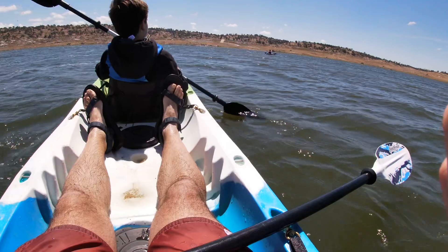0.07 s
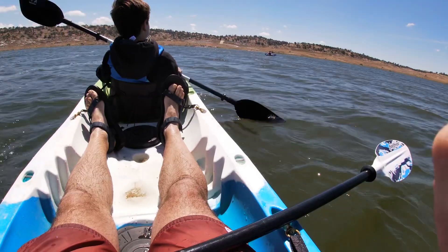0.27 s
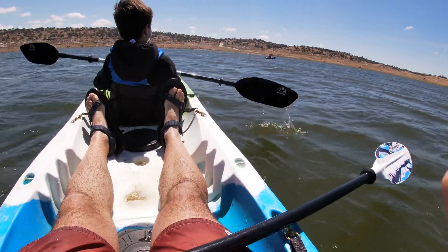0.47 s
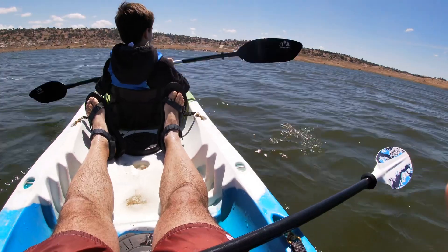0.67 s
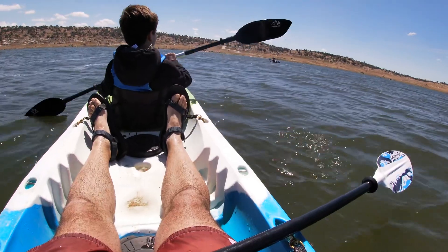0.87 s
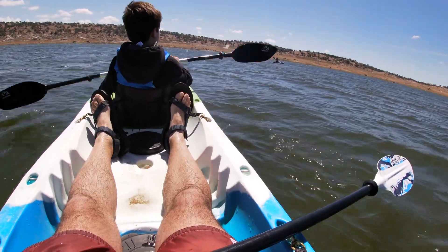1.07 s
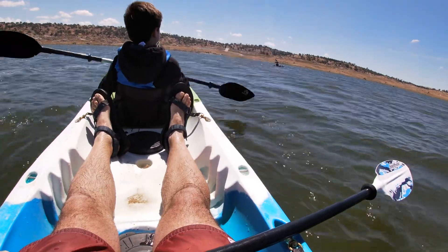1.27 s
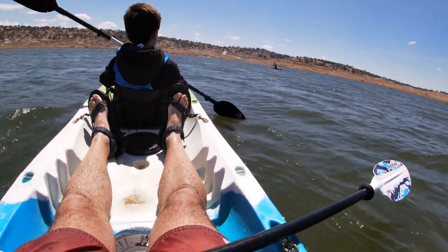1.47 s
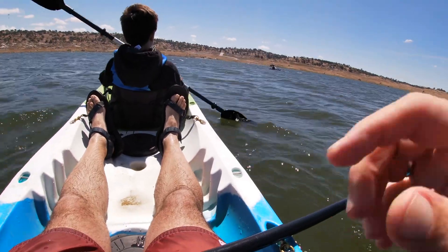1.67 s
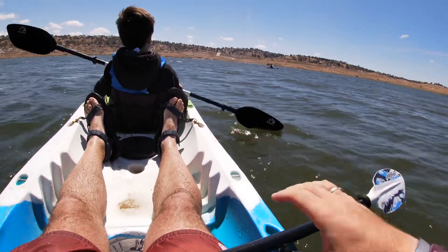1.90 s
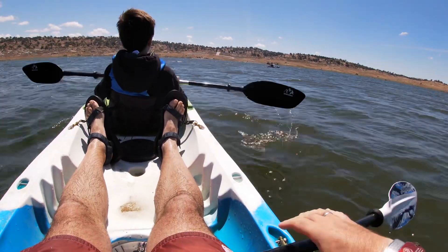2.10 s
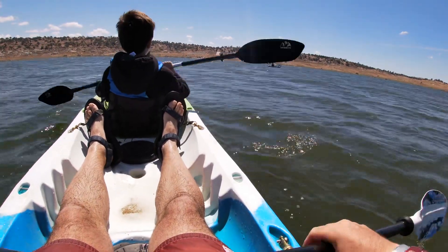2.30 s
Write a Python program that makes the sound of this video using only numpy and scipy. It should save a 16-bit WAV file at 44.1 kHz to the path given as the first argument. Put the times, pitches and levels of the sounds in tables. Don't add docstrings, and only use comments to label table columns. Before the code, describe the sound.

Small waves thump a hollow plastic kayak on open water, building to one loud paddle-shaft knock with a splash, then drips, gurgles and soft sloshing; close deck microphone with low wind rumble.

```python
import sys
import numpy as np
from scipy import signal
from scipy.fft import rfft, irfft
from scipy.io import wavfile
from scipy.ndimage import uniform_filter1d

SR = 44100
rng = np.random.default_rng(int(sys.argv[2]) if len(sys.argv) > 2 else 0)


def volts(x):
    e = np.asarray(x, float) / 20
    return 10 ** e


def wav_record(signal):
    frames = np.transpose(np.atleast_2d(signal))
    bounded = np.clip(frames, -1, 1)
    quanta = np.round(bounded * 32767).astype(np.int16)
    wavfile.write(sys.argv[1], SR, quanta)


N = 103458


def noise():
    return rng.standard_normal(N)


def smooth_twice(x, size):
    return uniform_filter1d(uniform_filter1d(x, size), size)


def curve(rows, col=1):
    rows = np.array(rows)
    return np.interp(np.arange(N) / SR, rows[:, 0], rows[:, col])


def tint(x, points):
    points = np.array(points)
    freq = np.arange(N // 2 + 1) * SR / N + 1
    level_db = np.interp(np.log(freq), np.log(points[:, 0]), points[:, 1], left=-60, right=-140)
    y = irfft(rfft(x) * volts(level_db), N)
    return y / np.std(y)


def walk(rate):
    hold = int(SR / rate)
    steps = np.repeat(rng.standard_normal(N // hold + 1), hold)
    return 1.3 * smooth_twice(steps, hold)[:N]


def grains(rows, rise, glide):
    out = np.zeros(N + SR)
    for s, db, hz, ms in rows:
        u = np.arange(-3 * rise, 5, 1000 / SR / ms)
        env = np.where(u < 0, np.exp(-(u / rise) ** 2), np.exp(-u / (1 - rise)))
        tone = np.cos(2 * np.pi * hz * ms / 1000 * u * (1 + glide * u))
        i = max(int(s * SR - 3 * rise * ms * SR / 1000), 0)
        out[i:i + len(u)] += volts(db) * env * tone
    return out[:N]


def scatter(count, lo_hz, hi_hz, cycles, spread_db):
    r = rng.random((count, 3))
    start = .05 + r[:, 0] * N / SR
    level_db = -spread_db * np.log(r[:, 2] + .05)
    hz = lo_hz * (hi_hz / lo_hz) ** r[:, 1]
    x = grains(zip(start, level_db, hz, 1000 * cycles / hz), .4, .05)
    return x / np.std(x)


# (time [s], level [dB])
HISS_GAIN = [(.04,-99),(.1,-75.5),(.16,-78),(.19,-90.5),(.28,-86),(.3,-82),(.6,-84.5),(.63,-73.5),(1.2,-75),(1.37,-75),(1.4,-79),(1.7,-94),(2.34,-86.5)]
# (frequency [Hz], level [dB])
HISS_COLOUR = [(1100, -12.5), (1650, 4), (2400, -8.5), (3200, -6), (3700, -10.5), (4830, -10.5),
               (5630, -8.5), (6500, -26), (9000, -47.5)]


def gain_hiss():
    return tint(noise(), HISS_COLOUR) * volts(curve(HISS_GAIN) + 5.5 + 2.0 * walk(40))


# (time [s], level [dB])
BREEZE = [
    (1.4, -100),
    (1.75, -79.5),
    (2.34, -72),
]


def breeze():
    return tint(noise(), [(3000, 8.5), (7000, -10.5), (10000, -16), (11000, -31)]) * volts(curve(BREEZE))


# (time [s], peak level [dB], pitch [Hz], length [ms])
CHIRP = (2.198, -66, 12400, 2.5)


def insect():
    return grains([CHIRP], .4, 0)


# (time [s], level [dB])
GUSTS = [(.04,-58.5),(.09,-48.5),(.28,-63.5),(.45,-48),(.58,-45.5),(.72,-46.5),(.82,-36),(.89,-44),(.94,-35.5),(1.07,-44.5),(1.21,-39.5),(1.31,-42.5),(1.42,-35),(1.54,-48.5),(1.72,-40),(1.8,-50),(1.96,-41.5),(2.2,-48),(2.31,-43.5)]


def wind():
    x = tint(noise(), [(18, -12), (36, 4), (48, 0), (80, -5), (130, -26.5), (250, -46.0)])
    local_rms = np.sqrt(smooth_twice(x ** 2, 2500))
    return x / local_rms * volts(curve(GUSTS))


# (time [s], slosh level [dB], wash level [dB])
FLOW = [(.04,-68.5,-71.5),(.28,-69,-78),(.31,-66.5,-78),(.6,-58.5,-74),(.64,-56.5,-68.5),(1.1,-51.5,-66.5),(1.35,-44,-63.5),(1.42,-42.5,-59),(1.7,-45.5,-58.5),(2.34,-45.5,-57.5)]
# (frequency [Hz], level [dB])
SLOSH_COLOUR = [(80, -3), (160, -1.5), (480, -3.5), (650, -9), (1100, -21)]
WASH_COLOUR = [(800, -8), (1290, 0.5), (1500, -7), (1640, -8), (2200, -3), (2900, -6.5), (3350, -28),
               (3700, -37)]


def water():
    gurgles = scatter(count=500, lo_hz=110, hi_hz=866, cycles=1.17, spread_db=2)
    slosh = tint(noise() * volts(1.0 * walk(36)) + 0.22 * gurgles, SLOSH_COLOUR)
    fizz = scatter(count=2500, lo_hz=800, hi_hz=3870, cycles=9.1, spread_db=2)
    wash = tint(noise() * volts(0.92 * walk(30)) + 0.5 * fizz, WASH_COLOUR)
    return slosh * volts(curve(FLOW) + 1.5) + wash * volts(curve(FLOW, col=2) - 2.0)


def during(start, end):
    t = np.arange(N) / SR
    return uniform_filter1d(1. * (t > start) * (t < end), size=1500)


# (start [s], end [s], low edge [Hz], high edge [Hz], level [dB])
FILMS = [
    (0.278, 0.56, 3170, 4010, -81.5),
    (0.621, 1.66, 2890, 3320, -74.5),
    (1.17, 1.377, 5100, 5840, -76),
    (1.383, 1.67, 4070, 4400, -79),
    (1.381, 1.68, 4600, 4750, -83.5),
    (1.12, 1.9, 6300, 7600, -90.5),
    (1.51, 1.46, 6400, 7370, -84),
    (1.752, 2.35, 11840, 12930, -100),
]


def films():
    out = 0
    for start, end, lo, hi, db in FILMS:
        film = tint(noise(), [(.97 * lo, -30), (lo, 0), (hi, 0), (1.03 * hi, -40)])
        patchy = volts(1.8 * walk(70))
        out = out + volts(db) * film * during(start, end) * patchy
    return out


# (start [s], end [s])
MIST_SPAN = (1.06, 1.6)


def mist():
    droplets = scatter(count=5000, lo_hz=1500, hi_hz=9000, cycles=4, spread_db=-4)
    droplets = tint(droplets, [(1500, 11), (6000, -6), (7000, -21), (10000, -34)])
    return volts(-74.5) * droplets * during(*MIST_SPAN)


# (time [s], peak level [dB], pitch [Hz])
TICKS = [(0.164,-74,4040),(.44,-63,3260),(0.44,-62,4500),(.451,-64,3640),(1.132,-72,6400),(1.161,-73,6700),(1.175,-55,5400),(1.192,-71,8600),(1.203,-57,5300),(1.229,-70,5600),(1.257,-58,5800),(1.276,-73,8200),(1.304,-71,7800),(1.355,-48,5490),(1.358,-65,3700),(1.376,-69,6600),(2.211,-64,3670),(2.21,-62,2750)]


def ticks():
    cycles = 9.3
    tones = grains([(s, db, hz, 1000 * cycles / hz) for s, db, hz in TICKS], 0.52, 0)
    return tones * (0.7 + 3 * smooth_twice(noise(), 24))


# (time [s], peak level [dB])
SLAPS = [(0.164, -55.5), (0.296, -61.5), (0.643, -66.5), (0.844, -49.5), (1.159, -53), (1.193, -53),
         (1.216, -44.5), (1.255, -47.5), (1.275, -53), (1.304, -57), (1.356, -51), (1.368, -39),
         (2.209, -51)]
# (frequency [Hz], level [dB per Hz])
SLAP_COLOUR = [(900, 5), (2200, 4.5), (5500, -8.5), (7000, -29), (10000, -29)]


def slaps():
    t, env = np.arange(N) / SR, 0
    t60_s = 0.025
    for s, db in SLAPS:
        env = env + volts(db) * (t > s) * np.exp(-np.log(1000) * np.abs(t - s) / t60_s)
    return uniform_filter1d(env, size=60) * tint(noise(), SLAP_COLOUR)


# (time [s], peak level [dB], pitch [Hz], length [ms])
RISERS = [
    (1.435,-48,1400,4.1),
    (1.553,-45,1205,6.5),
    (1.826,-48.5,1960,6.7),
]


def closing_bubbles():
    return grains(RISERS, 0.2, 0.16)


# (time [s], peak level [dB], pitch [Hz], length [ms])
DROPS = [(.164,-54.5,1150,4),(.165,-52,1870,1.7),(.551,-62,1670,6.9),(.7,-51,1975,5.7),(.845,-42.5,2080,1.1),(.848,-45,5130,0.87),(1.095,-51,1255,7.1),(1.144,-47,1480,5.1),(1.201,-41.5,1642,9.2),(1.205,-40,2210,1.4),(1.218,-47,3320,1.5),(1.272,-39.5,2630,2.2),(1.301,-41,1660,2.7),(1.334,-47,1730,6.4),(1.607,-46,980,6.1),(1.635,-54,1270,10),(1.72,-51,1305,5.6),(1.79,-48.5,1410,6.9),(1.855,-57,1850,14),(1.882,-53.5,3100,4.4),(1.925,-42.5,996,4.2),(1.992,-49,1890,2.2),(2.01,-42,1326,7.7),(2.128,-57,1150,6),(2.134,-49,2470,2.8),(2.142,-56,2240,11),(2.157,-45.5,1317,10),(2.207,-44,1216,8),(2.238,-51.5,2220,5.4),(2.298,-50,1130,6.6),(2.316,-45,2610,4)]


def drops():
    return grains(DROPS, 0.21, 0.021)


# (time [s], peak level [dB], pitch [Hz], length [ms])
KNOCKS = [(.195,-55.5,833,5.3),(.623,-35,684,5.2),(.624,-35,387,3.4),(.726,-20.5,334,4.1),(.741,-39.5,495,35),(.995,-34,381,16),(1.113,-34.5,464,4),(1.183,-48.5,940,11),(1.22,-32,423,5),(1.32,-36,526,9.3),(1.35,-34.5,900,4.9),(1.359,-27.5,868,6.4),(1.367,-23,658,5),(1.371,-5.5,569,2.32),(1.372,-34,1263,10.7),(1.379,-18.5,395,18),(1.399,-33,471,18),(1.4,-24,306,17),(1.396,-39,782,16),(1.413,-39,757,13),(1.5,-22.5,536,2.34),(1.51,-34,360,9.8),(2.03,-25,415,5.8),(2.033,-30,759,4.3),(2.05,-34.5,370,11),(1.72,-49,636,11),(1.78,-49,555,47),(1.853,-49,775,17),(1.972,-50.5,780,14),(2.276,-41,768,7.3)]


def knocks():
    return grains(KNOCKS, 0.44, -0.015)


# (time [s], peak level [dB], pitch [Hz], length [ms])
THUMPS = [(.045,-53.5,206,8.2),(.09,-41.5,123,6.5),(.19,-58,169.5,15),(.297,-52,189,12),(.327,-59,407,3.9),(.425,-51,178,18),(.452,-34,110,6.9),(.468,-46,196,20),(.571,-32,154,9.8),(.63,-30.5,214,15.5),(.657,-26.5,187,11),(.738,-29,264,7.8),(.758,-26.5,186,11.7),(.812,-32,93,19),(.814,-16.5,176.4,6.1),(.826,-24,178,32),(.852,-30,198,6.4),(.905,-27.5,212,6.4),(.924,-19,281,4.6),(.94,-48.5,49.7,12),(1.019,-31.5,181,19),(1.11,-37,199,16),(1.16,-44.5,193,11),(1.215,-27,43.7,42),(1.222,-37,258,10),(1.26,-26.5,119.3,16),(1.377,-14,203,8.9),(1.387,-17,163,5.1),(1.399,-15.5,187,16),(1.417,-23,136.6,9),(1.444,-25,256,13),(1.527,-21.5,296,2.8),(1.575,-37.5,218,15),(1.81,-52.5,275.5,24),(1.855,-36.5,150.3,15),(1.912,-29.5,174,13),(1.927,-20,165.2,20.2),(1.975,-25.5,182,4.5),(2.04,-21.5,197,3.9),(2.298,-36.5,193.5,27),(2.31,-31.5,56.4,32)]


def thumps():
    return -grains(THUMPS, 0.47, -0.0019)


# (frequency [Hz], level [dB], decay time t60 [s])
HULL_MODES = [
    (167.7, -0.5, 0.17),
    (240, -14.5, .15),
    (405, -13.5, 0.11),
]


def hull(x):
    modes_db, rattle_db, rattle_t60_s = -7.5, -7.5, 0.18
    t = np.arange(SR // 2) / SR
    ring = 0
    for hz, db, t60 in HULL_MODES:
        ring = ring + volts(db) * np.sin(2 * np.pi * hz * t) * np.exp(-np.log(1000) * t / t60) / t60
    dense = rng.standard_normal(len(t)) * np.exp(-np.log(1000) * t / rattle_t60_s) * (t > .004)
    dense = volts(rattle_db) * dense / np.sqrt(np.sum(dense ** 2))
    response = volts(modes_db) * ring * 14 / SR + dense
    return x + signal.fftconvolve(x, response)[:N]


def scene():
    background = gain_hiss() + breeze() + insect() + wind() + water()
    spray = films() + mist() + ticks() + slaps()
    body = hull(closing_bubbles() + drops() + knocks() + thumps())
    return (background + spray + body)[None]


def band_limit(x):
    return signal.sosfilt(signal.butter(12, 12900, fs=SR, output="sos"), x)


def record(dry):
    start_s, ramp_s = .035, 0.0011
    mix = dry * np.clip((np.arange(N) / SR - start_s) / ramp_s, 0, 1)
    return band_limit(mix)


dry = scene()
out = record(dry)
wav_record(out)
```